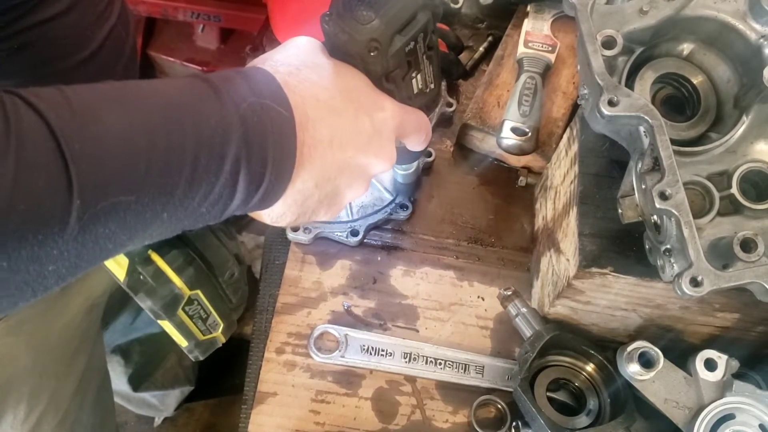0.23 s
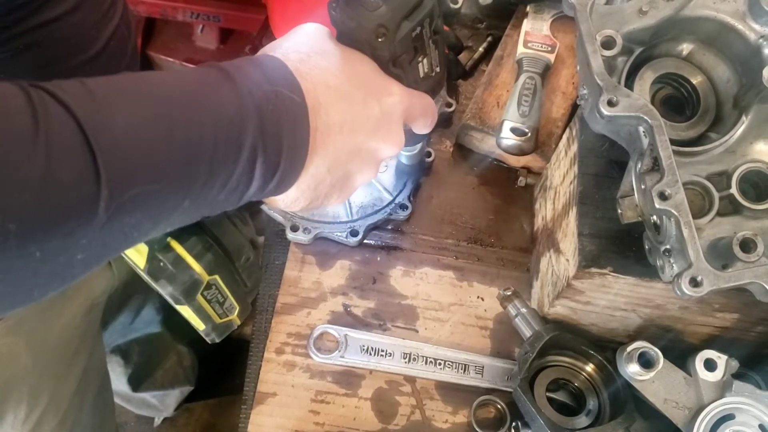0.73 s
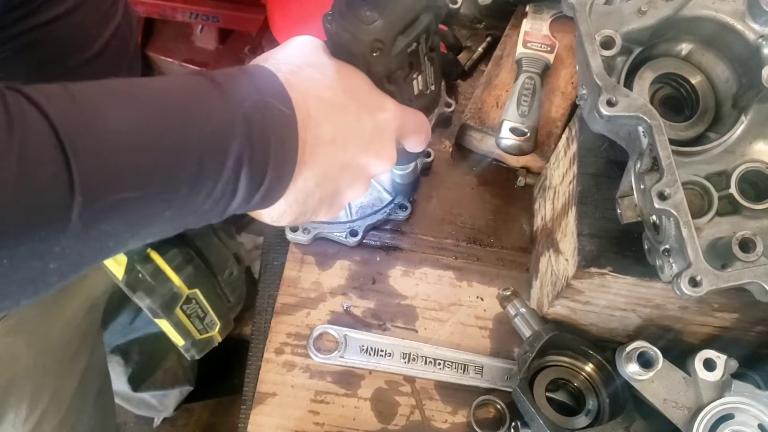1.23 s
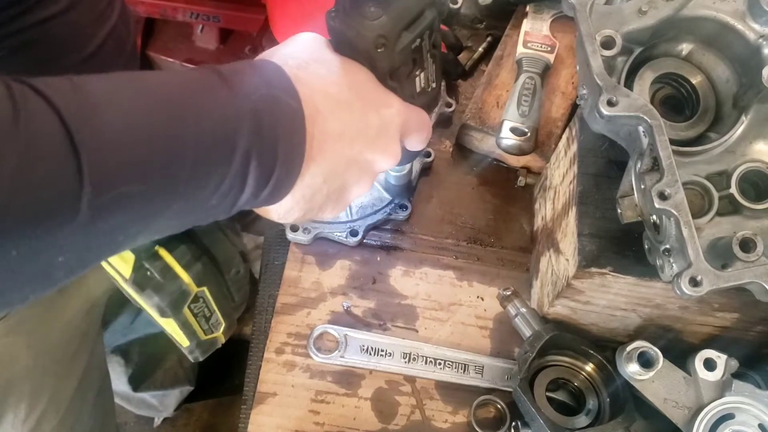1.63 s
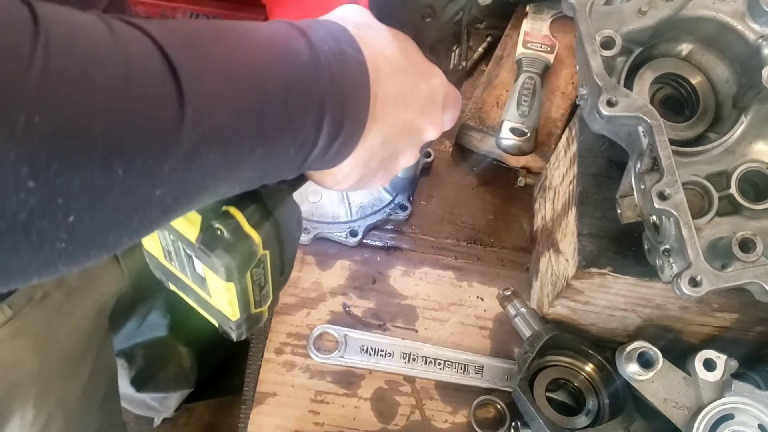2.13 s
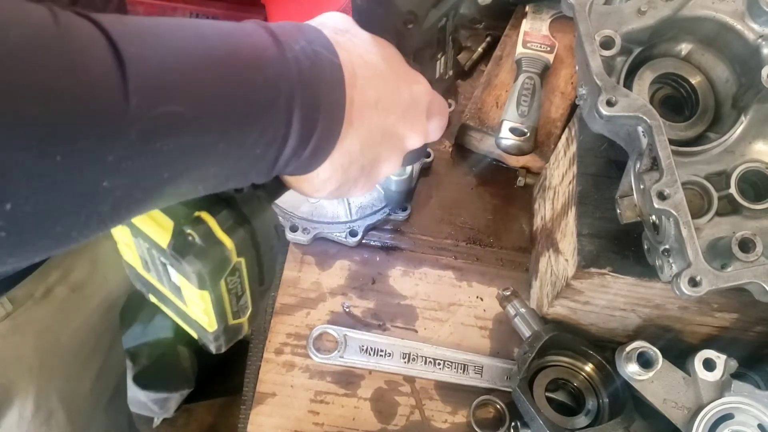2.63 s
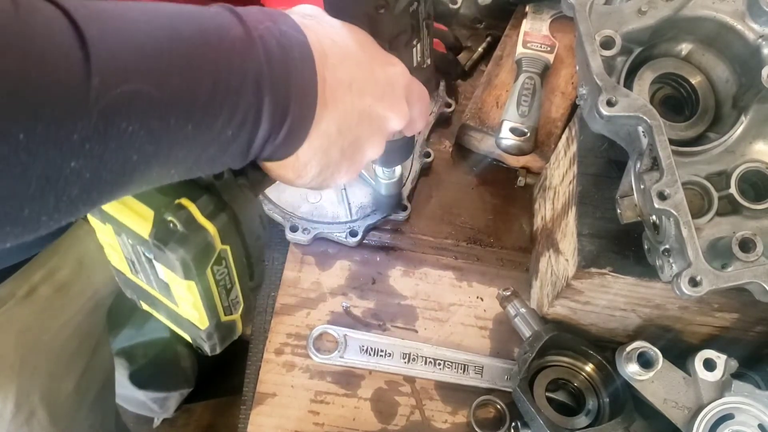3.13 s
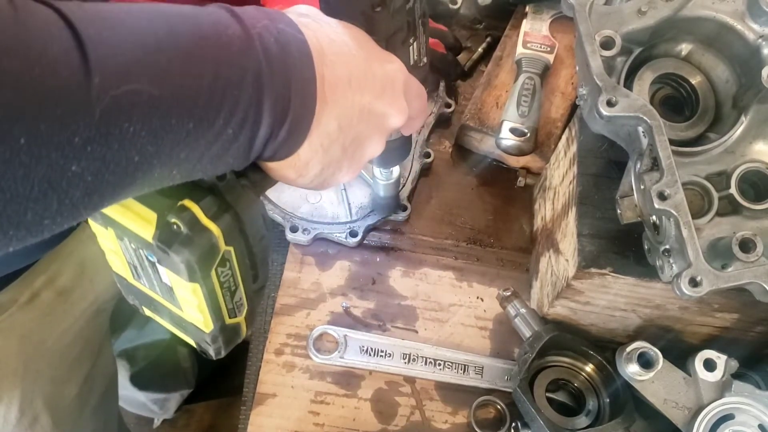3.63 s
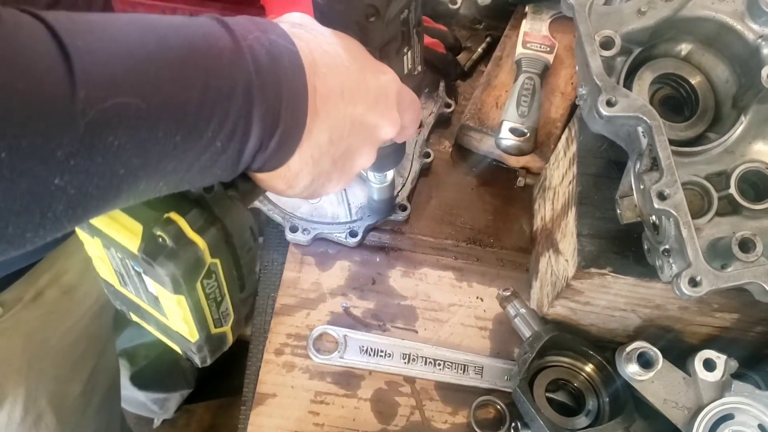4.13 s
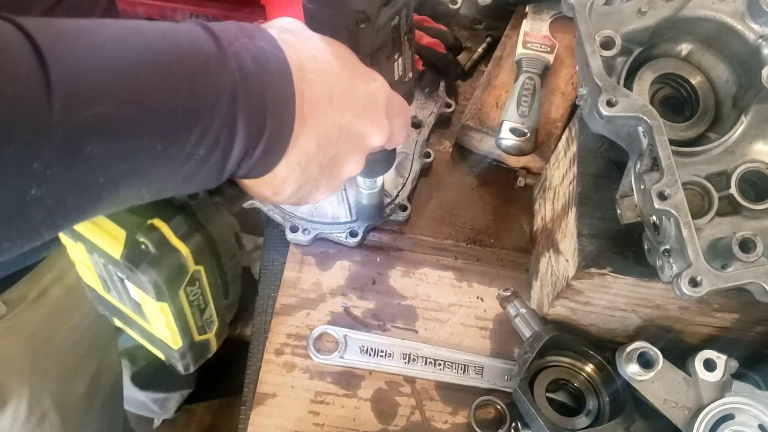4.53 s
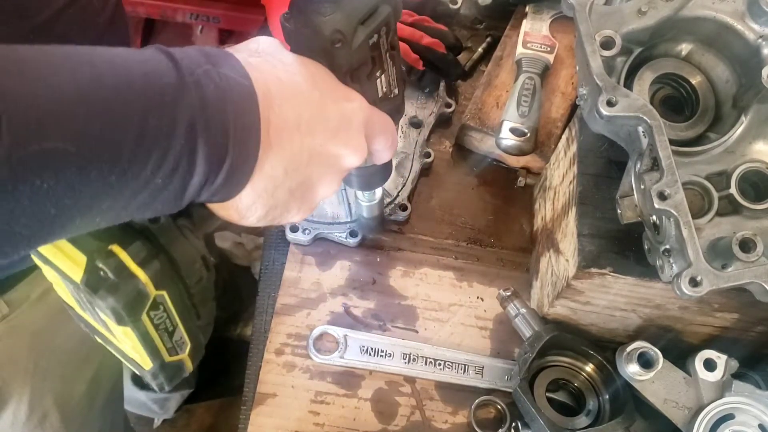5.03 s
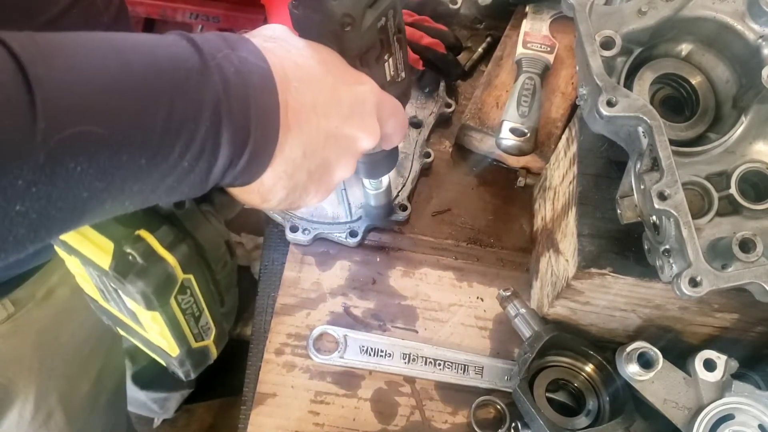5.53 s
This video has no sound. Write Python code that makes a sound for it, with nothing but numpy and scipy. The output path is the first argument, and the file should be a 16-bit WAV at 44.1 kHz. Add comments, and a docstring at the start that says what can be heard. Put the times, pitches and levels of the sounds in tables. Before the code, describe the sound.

Very close and dry in stereo: a shrill drill whine and a continuous gritty metallic rasp from a wire brush on a cast metal part. The sound pulses rapidly with the lopsided brush. A low bump comes just before two seconds as the hand eases off; pressure returns, slackens briefly near four and a half seconds, then resumes to the end. Thin squeaks, ringing metal, small rattles and a shaking wooden bench lie underneath.

```python
"""A shrill whine and a dense metallic rasp: close by on a workbench, a cordless drill with a wire brush
scrubs old sealant off an aluminium cover. Motor and gears are sines on multiples of the motor speed.
Random flicks of the wire tips are filtered into rasp, hiss and scrubbing, and ring the modes of the cover.
The brush runs out of true, so load, rasp and one shrill gear tone throb once per turn.
Single wires squeak, the cover rattles at times, and the wooden bench shakes and rumbles underneath."""
import sys
import numpy as np
from scipy import signal
from scipy.fft import rfft, irfft
from scipy.io import wavfile

SR = 44100
rng = np.random.default_rng(int(sys.argv[2]) if len(sys.argv) > 2 else 0)


def digitize_waveform(pressure):
    """Quantize a signal to 16-bit integers and store it at the path in sys.argv[1].

    Rows of a 2-D input are taken as channels; values are limited to [-1, 1].
    """
    field = np.atleast_2d(pressure).T
    bounded = np.clip(field, -1, 1)
    quanta = np.round(bounded * 32767).astype(np.int16)
    wavfile.write(sys.argv[1], SR, quanta)


N = 254898
TIME = np.arange(N) / SR
FREQS = np.maximum(np.fft.rfftfreq(N, 1 / SR), 1)
WHINE_ORDER = 15  # the main gear whine is this multiple of the motor speed

# how hard the brush is pressed on; the hand eases off twice: (time [s], pressure [dB re full pressure])
PRESSURE = [(0.0, 0.2), (1.73, -0.4), (1.9, -10.9), (2.46, -11.8), (2.61, -6.3), (2.79, -3.1), (4.32, -6.2),
            (4.47, -10.2), (4.59, -3.1), (5.78, 0.8)]


def rotation():
    """Motor angle, brush angle, and the load and the surge of speed, which each peak once per brush turn."""
    # pitch of the main gear whine, wandering with the bite of the brush: (time [s], pitch [Hz])
    whine_pitch = [(0.0, 4296), (0.03, 4280), (0.15, 4297), (0.22, 4282), (0.33, 4308), (0.45, 4285),
                   (0.52, 4296), (0.85, 4295), (0.94, 4315), (1.05, 4290), (1.45, 4312), (1.56, 4279),
                   (1.74, 4293), (1.89, 4280), (2.27, 4271), (2.48, 4297), (2.66, 4283), (2.71, 4264),
                   (2.81, 4290), (2.9, 4266), (2.93, 4292), (3.02, 4266), (3.1, 4297), (3.19, 4303),
                   (3.26, 4280), (3.31, 4305), (3.5, 4300), (3.53, 4286), (3.61, 4304), (3.85, 4305),
                   (3.94, 4279), (4.07, 4269), (4.12, 4288), (4.21, 4299), (4.33, 4274), (4.43, 4288),
                   (4.47, 4276), (4.68, 4301), (4.79, 4273), (4.88, 4298), (4.97, 4287), (5.01, 4312),
                   (5.06, 4288), (5.1, 4301), (5.34, 4287), (5.57, 4292), (5.63, 4280), (5.78, 4306)]
    gear_ratio, press_at_turns, surge_lag_rad = 13.36, 0.064, 1.55
    whine_hz, = in_time(whine_pitch)
    angle = 2 * np.pi * np.cumsum(whine_hz) / WHINE_ORDER / SR
    brush = angle / gear_ratio + 2 * np.pi * press_at_turns
    # the motor surges each time the long side of the brush lets go, and hunts as the friction varies
    wobble_rad = 0.025 - 0.01 * turned()
    jitter_rad = 0.015 + 0.015 * turned()
    hunting_rad = 0.017
    angle = angle + wobble_rad * np.sin(brush - surge_lag_rad)
    angle = angle + jitter_rad * drift(24) + hunting_rad * drift(5.5)
    load = np.cos(brush)
    surge = np.cos(brush - surge_lag_rad)
    return angle, brush, load, surge


def gears(angle, brush, surge):
    """Gear teeth whine: the main tone swells with each surge, the shrill one throbs and chirps with each bite."""
    # main gear whine as the drill is moved about: (time [s], level [dB], left over right [dB])
    gear_whine = [(0.0, -30, -1), (0.19, -29, -5), (0.25, -32.5, -1), (0.3, -27.0, -8), (0.46, -31.5, 0),
                  (0.57, -28, -5), (0.87, -32, -1), (0.9, -28, -6), (1.11, -31.0, -3), (1.21, -27.0, -6),
                  (1.51, -29.0, -7), (1.56, -32.5, -2), (1.74, -30, -5), (1.81, -34, 0), (1.92, -33.5, 1),
                  (2.04, -36.5, -4), (2.29, -33, -4), (2.36, -37.0, -9), (2.54, -35, -17),
                  (2.59, -35.0, -9), (2.72, -31.5, -7), (2.95, -35.5, -6), (3.04, -34, -9),
                  (3.16, -34.5, -7), (3.37, -33, -9), (3.5, -32, -6), (3.55, -35.5, -8), (3.67, -33.5, -6),
                  (3.82, -33, -11), (3.91, -36, -5), (4.01, -37, -12), (4.06, -32, -7), (4.18, -41, -11),
                  (4.22, -30, -6), (4.28, -39, -5), (4.34, -32.5, -9), (4.44, -39.5, -7), (4.49, -39, -17),
                  (4.61, -36.5, -5), (4.71, -32.5, -18), (4.76, -34.5, -7), (4.83, -31.5, -11),
                  (4.97, -34, -9), (5.1, -32, -18), (5.39, -35, -12), (5.49, -36, -15), (5.72, -34.5, -13),
                  (5.78, -35, -11)]
    gear_db, gear_side_db = in_time(gear_whine)
    pressure_db, = in_time(PRESSURE)
    depth = from_db(0.6 * pressure_db)  # pressing harder deepens throb and chirp
    whine = tone(WHINE_ORDER * angle, gear_db, gear_side_db, lead=0.76, rough=0.13, waver_db=0.15)
    whine_throb = 1 + 0.14 * depth * surge
    # in the new grip the bites come unevenly, and the shrill tone flutters
    bite = brush + turned() * (1.0 * drift(7.6) - 0.7)
    chirp = 0.5 * depth * np.cos(bite - 0.9)
    shrill_db = follow_hand(level_db=-33.3, per_pressure=0.8, turn_db=-1.3)
    shrill = tone(19 * angle - chirp, shrill_db, -13.5, lead=-1.82, rough=0.12 + 0.2 * turned(),
                  waver_db=0.54 + 1.8 * turned(), wavers_per_s=24)
    shrill_throb = 1 + 0.8 * depth * np.cos(bite)
    return whine * whine_throb + shrill * shrill_throb


def motor(angle):
    """Harmonics of the rotor, chiefly on every tenth, where slots pass the magnets."""
    # whines on the 10th, 20th, 21st and 40th harmonic: (time [s], level [dB], left over right [dB])
    whine_10 = [(0, -45.5, 4), (2, -46, 10), (2.8, -45, 4), (3.6, -44, 15), (4.03, -46.5, 4),
                (4.7, -42.5, 0), (5.78, -42.5, 2)]
    whine_20 = [(0, -38, -5), (1.7, -33.5, -4), (1.9, -39, -2), (2.1, -36.5, -15), (2.52, -33.5, -13),
                (2.72, -38.5, -17), (2.95, -39, -7), (3.75, -44, -9), (4.6, -43, 2), (5.05, -40, -9),
                (5.78, -40.5, -6)]
    whine_21 = [(0, -45, 4), (1.4, -43.5, 5), (1.9, -52, -5), (4.5, -47, 2), (5.0, -43, 3)]
    whine_40 = [(0, -41, -5), (.95, -38.5, 1), (1.5, -39.5, -9), (2.05, -38.5, 8), (2.82, -41, 5),
                (3.0, -39, 4), (4.25, -36.5, 6), (5.1, -33.5, 10), (5.78, -41.5, -1)]
    # tilting the drill shifts the 20th between the microphones: (time [s], lead of the left [rad])
    tilting = [(0, -4.5), (1.8, -3), (2.05, 0), (2.65, 0.5), (2.9, -3.5), (5.78, 6)]
    # faint harmonics: (multiple of motor speed, level [dB], left over right [dB])
    faint_harmonics = [(3, -52.5, 2), (5, -49, 4), (11, -51.5, 6), (13, -52, 25), (14, -53.5, 0),
                       (18, -50, -5), (22, -47.5, 20), (23, -51.5, -12), (26, -55, 23), (41, -53, 11),
                       (48, -57, 12), (49, -40, 7)]
    # rough, faint hum at low multiples: (multiple of motor speed, level [dB], left over right [dB])
    low_hum = [(1, -69, -5), (2, -67, 12), (4, -55, -17)]
    lead_20, = in_time(tilting)
    level_30 = follow_hand(level_db=-46.5, per_pressure=0.62, turn_db=-4)
    level_50 = follow_hand(level_db=-42, per_pressure=-0.3, turn_db=4.4)
    out = tone(10 * angle, *in_time(whine_10), lead=1.0, rough=0.15, waver_db=0.7)
    out += tone(20 * angle, *in_time(whine_20), lead=lead_20, rough=0.15 + 0.3 * turned(), waver_db=1.1)
    out += tone(21 * angle, *in_time(whine_21), lead=1.5, rough=0.45, waver_db=1)
    out += tone(30 * angle, level_30, 16, lead=1.0, rough=0.35, waver_db=1.5)
    out += tone(40 * angle, *in_time(whine_40), lead=2.09, rough=0.32, waver_db=1.0)
    out += tone(50 * angle, level_50, 10, lead=2.3, rough=0.26, waver_db=1.5)
    for multiple, level_db, side_db in faint_harmonics:
        out += tone(multiple * angle, level_db, side_db, lead=0.99, rough=0.28, waver_db=1.5)
    for multiple, level_db, side_db in low_hum:
        out += tone(multiple * angle, level_db, side_db, rough=0.9, waver_db=1.5)
    return out


def wire_rasp(load):
    """Thousands of wire flicks a second rasp over the metal, hiss at the tips and scrub dully on the sealant."""
    # spectra of rasp, hiss and scrubbing: (frequency [Hz], left density [dB], right density [dB])
    rasp_spectrum = [(560, -50, -52), (700, -27, -29), (820, -12, -12), (1400, -9, -11), (2100, -7, -8),
                     (2700, -8, -8), (3200, -7, -5.5), (3900, -6, -4.5), (4700, -2.5, -1), (5500, -5, -.5),
                     (5900, -7, -5), (6700, -7.5, -11), (7300, -8, -18), (8000, -15, -29), (9200, -29, -36)]
    hiss_spectrum = [(9000, -24, -29), (9750, -9, -12), (10600, -5, -8), (11800, -2.5, -5), (12700, 0, -3),
                     (13600, -1, -8), (14600, -1, -9)]
    scrub_spectrum = [(190, 1, 2), (255, -2, -1), (340, -32, -28), (485, -32, -32), (560, -4, -11),
                      (640, 0, -9), (705, -6, -13), (800, 0, -2), (950, -12, -12)]
    flicks = wire_flicks(15000 * (1 + 0.15 * load), spread_db=2.5)
    flicks = two_ears(flicks, likeness=0.78, up_to_hz=4000)
    rasp_db = follow_hand(level_db=-31.5, per_pressure=0.077, turn_db=-0.32)
    hiss_db = follow_hand(level_db=-34, per_pressure=0.05, turn_db=-0.11)
    scrub_db = follow_hand(level_db=-58.5, per_pressure=0.38, turn_db=0.22)
    rasp = from_db(rasp_db) * colour(flicks, rasp_spectrum)
    hiss = from_db(hiss_db) * colour(flicks, hiss_spectrum)
    scrub = from_db(scrub_db) * vary_bands(colour(flicks, scrub_spectrum))
    return rasp + hiss + scrub


def cover_ring(load):
    """Wire strikes excite the modes of the cover, which slide in pitch as the brush moves over it, and its rim."""
    # modes of the cover, then of the rim: (frequency [Hz], width [Hz], level [dB], left over right [dB])
    cover_modes = [(960, 16, -5.5, 15), (1122, 69, 3.5, 15), (1452, 84, 9, 0), (1494, 23, 5.5, 12),
                   (3370, 190, -12, -6)]
    rim_modes = [(1771, 42, 0, 3)]
    # the wires catch an edge, so the rim rings: (time [s], half length [s], rise [dB])
    catches = [(0.056, 0.32, 12), (0.537, 0.14, 11), (0.97, 0.032, 14), (1.168, 0.062, 14),
               (1.37, 0.14, 10.5), (1.53, 0.044, 11.5), (2.741, 0.09, 10), (3.25, 0.74, 12.5),
               (3.85, 0.14, 6), (5.52, 0.21, 14.5)]
    strikes = wire_flicks(3000 * (1 - 0.25 * load), spread_db=3.5)
    strikes = two_ears(strikes, likeness=0.79, up_to_hz=5000)
    ring_db = follow_hand(level_db=-40.5, per_pressure=0.023, turn_db=-1.1)
    pitch_share = 0.021 * (load + drift(24.5))
    ring = from_db(ring_db) * slide(resonate(strikes, cover_modes), pitch_share)
    rim_db = follow_hand(level_db=-50, per_pressure=0.48, turn_db=-5.5)
    for s, half_length, rise_db in catches:
        rim_db = rim_db + rise_db * swell(s, half_length)
    rim = from_db(rim_db) * resonate(strikes * (1 - 0.25 * load), rim_modes)
    return ring + rim


def wire_squeak(load):
    """Single wires squeak on a tone that slides with load and chance, most of all near the end."""
    squeak_hz = 4734 + 75.5 * (drift(17.7) + 0.47 * load)
    squeak_db = follow_hand(level_db=-52, per_pressure=0.98, turn_db=0)
    squeak_db = squeak_db + 6.5 * swell(5.25, half_length=0.6)
    return tone(2 * np.pi * np.cumsum(squeak_hz) / SR, squeak_db, 1.5, rough=0.6, waver_db=1.2)


def cover_rattle():
    """The cover works loose and rattles on the bench: random knocks, coloured low and coming in swells."""
    # rattles: (time [s], half length [s], level [dB])
    rattles = [(0.084, 0.063, -61), (0.28, 0.028, -52.5), (0.43, 0.036, -53), (0.587, 0.027, -53),
               (1.303, 0.02, -55), (1.727, 0.039, -51), (2.73, 0.071, -48.5), (3.1, 0.28, -52.5),
               (3.42, 0.076, -56.5), (3.53, .015, -46), (3.77, 0.17, -52.5), (4.057, 0.11, -51.5),
               (4.896, 0.035, -56.5), (5.562, 0.29, -50.5)]
    # spectrum of the rattle: (frequency [Hz], left density [dB], right density [dB])
    rattle_spectrum = [(190, 0, 0), (285, 1, 2), (365, -18, -9), (428, 7, -1), (485, -13, -22),
                       (570, 2, -6), (625, -7, -12), (760, -6, -10), (950, -20, -20)]
    knocks = two_ears(wire_flicks(1000, spread_db=3.5), likeness=0.32, up_to_hz=1500)
    loose = sum(from_db(level_db) * swell(s, half_length) for s, half_length, level_db in rattles)
    return loose * vary_bands(colour(knocks, rattle_spectrum))


def bench(brush):
    """The lopsided brush shakes the wooden bench; the cover bumps and drags on it as it shifts."""
    # rumble of the bench: (frequency [Hz], density [dB])
    rumble_spectrum = [(20, -13), (38, -3), (62, 3.5), (88, 10), (112, 0), (145, 7), (180, 0.5), (240, -38),
                       (330, -92)]
    # shaking of the bench: (multiple of brush speed, level [dB])
    shake_harmonics = [(3, -56.5), (4, -47.5), (5, -62), (6, -56.5), (7, -54), (8, -64.5)]
    # change in shaking as the cover is held down more or less firmly: (time [s], change [dB])
    shaking = [(0, -5), (0.15, 4), (0.39, -3.5), (0.64, -2), (0.85, -1), (1.46, 2.5), (2.05, -3),
               (2.22, 1.5), (2.8, -8), (3.07, 1), (3.6, -5.5), (3.88, 0.5), (4.43, -7), (4.57, -1.5),
               (4.97, -8.5), (5.2, 1.5), (5.78, -5)]
    # the cover shifts and bumps the bench: (time [s], level [dB])
    bumps = [(1.706, -26), (1.758, -47)]
    # modes that a bump excites: (frequency [Hz], level re the bump [dB], decay by 60 dB [s])
    bench_modes = [(59, -6, 0.4), (167, -12, 0.5)]
    # the cover drags over the wood with a low groan: (time [s], pitch [Hz], level [dB], half length [s])
    groans = [(0.756, 151.4, -44, 0.052), (5.48, 138.5, -45, 0.13)]
    noise = two_ears(rng.standard_normal((2, N)), likeness=0.59, up_to_hz=600)
    out = from_db(-50) * colour(noise, rumble_spectrum)
    shake_db, = in_time(shaking)
    for multiple, level_db in shake_harmonics:
        out += tone(multiple * brush, level_db + shake_db, 0.3, rough=0.2, waver_db=1.5)
    for s, bump_db in bumps:
        age = np.maximum(TIME - s, 0)
        for hz, level_db, t60 in bench_modes:
            decay = np.exp(-np.log(1000) * age / t60)
            out += from_db(bump_db + level_db) * np.sin(2 * np.pi * hz * age) * decay
    for s, hz, level_db, half_length in groans:
        out += tone(2 * np.pi * hz * TIME, level_db, 0, rough=0.26) * swell(s, half_length)
    return out


def turned():
    """Rises from 0 to 1 as the grip changes and the drill turns another side to the microphones."""
    middle_s, scale_s = 2.72, 0.14
    return 0.5 + 0.5 * np.tanh((TIME - middle_s) / scale_s)


def follow_hand(level_db, per_pressure, turn_db):
    """Level in dB: at full pressure, plus dB per dB of pressure, plus the change once the drill has turned."""
    pressure_db, = in_time(PRESSURE)
    return level_db + per_pressure * pressure_db + turn_db * turned()


def tone(angle, level_db, side_db, lead=0, rough=0.15, waver_db=5.5, wavers_per_s=13):
    """One sine at both microphones; the left leads by some radians, and chance roughens and wavers it."""
    phase = angle + rng.uniform(0, 2 * np.pi) + lead * np.array([[1], [0]])
    wave = np.sin(phase) * (1 + rough * drift(29)) + np.cos(phase) * rough * drift(18.5)
    level = from_db(level_db + waver_db * drift(wavers_per_s))
    return np.sqrt(2) * level * pan(side_db) * wave


def wire_flicks(per_s, spread_db):
    """Clicks at random moments, as wire tips catch and spring free, each with its own strength; rms 1."""
    born = rng.random((2, N)) < per_s / SR
    sign = rng.choice([-1, 1], (2, N))
    strength = from_db(spread_db * rng.standard_normal((2, N)))
    return rms_one(born * sign * strength)


def resonate(flicks, modes):
    """The wire tips keep modes of the metal ringing, each a two-pole resonance; rms 1."""
    out = 0
    for hz, width_hz, level_db, side_db in modes:
        r = np.exp(-np.pi * width_hz / SR)
        poles = [1, -2 * r * np.cos(2 * np.pi * hz / SR), r * r]
        zeros = np.array([1, 0, -1]) * (1 - r * r) / 2
        out = out + from_db(level_db) * pan(side_db) * signal.lfilter(zeros, poles, flicks)
    # a small part radiates little bass, and the skirts of its modes die out in the treble
    band = signal.butter(6, [720, 6500], "band", fs=SR, output="sos")
    return rms_one(signal.sosfilt(band, out))


def slide(x, share):
    """Raise and lower the pitch of a stereo sound by a moving share, by reading it faster or slower."""
    place = np.cumsum(1 + share - share.mean()) / SR
    return np.array([np.interp(place, TIME, channel, period=N / SR) for channel in x])


def vary_bands(x):
    """Random gains vary the level of overlapping bands of a low noise; rms 1."""
    spread_db, rate_hz, width_hz = 6.5, 14, 170
    out = 0
    for hz in np.arange(0, 1200, width_hz):
        band = np.maximum(1 - np.abs(FREQS - hz) / width_hz, 0)
        level = from_db(spread_db * np.minimum(drift(rate_hz), 1))
        out = out + irfft(rfft(x) * band, N) * level
    return rms_one(out)


def colour(x, spectrum):
    """Give x a spectrum that falls steeply beyond its ends; rms 1."""
    hz, *columns = np.transpose(spectrum)
    outside = np.maximum(np.maximum(hz[0] / FREQS, FREQS / hz[-1]), 1)
    gains = from_db([np.interp(np.log(FREQS), np.log(hz), c) for c in columns]) / outside ** 6
    return rms_one(irfft(rfft(x) * gains, N))


def two_ears(draw, likeness, up_to_hz, lag_s=0.00004):
    """Two unrelated signals become a stereo pair, alike in the bass and less so above; the right comes later."""
    mid, side = rfft(draw)
    alike = np.clip(likeness, 0, 1) / (1 + (FREQS / up_to_hz) ** 2)
    delay = np.exp(-2j * np.pi * FREQS * lag_s * np.array([[0], [1]]))
    pair = np.sqrt(1 + alike) * mid + np.sqrt(1 - alike) * side * [[1], [-1]]
    return irfft(delay * pair, N)


def pan(side_db):
    """Left and right gains of equal total power."""
    tilt = from_db(np.atleast_1d(side_db))
    return np.array([tilt, np.ones_like(tilt)]) * np.sqrt(2 / (1 + tilt ** 2))


def swell(s, half_length):
    """A bell that rises to 1 at time s and fades."""
    return np.exp(-((TIME - s) / half_length) ** 2)


def drift(rate_hz):
    """Slow chance with spread 1: noise that falls off above a rate."""
    return rms_one(irfft(rfft(rng.standard_normal(N)) / (1 + (FREQS / rate_hz) ** 2), N))


def in_time(rows):
    """Each column of a curve at every sample."""
    s, *columns = np.transpose(rows)
    return [np.interp(TIME, s, c) for c in columns]


def rms_one(x):
    """Scale to rms 1."""
    return x / np.sqrt(np.mean(x ** 2) + 1e-20)


def from_db(db):
    """Decibels to gain."""
    return 10 ** (np.asarray(db) / 20)


def scene():
    """One rotation drives drill, brush and bench."""
    angle, brush, load, surge = rotation()
    drill = gears(angle, brush, surge) + motor(angle)
    wires = wire_rasp(load) + cover_ring(load) + wire_squeak(load)
    return drill + wires + cover_rattle() + bench(brush)


def record(dry):
    """A steep low-pass cuts the top above 14560 Hz."""
    return signal.sosfilt(signal.ellip(12, 0.1, 90, 14560, fs=SR, output="sos"), dry)


dry = scene()
out = record(dry)
digitize_waveform(out)
```